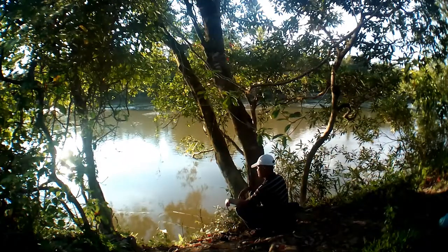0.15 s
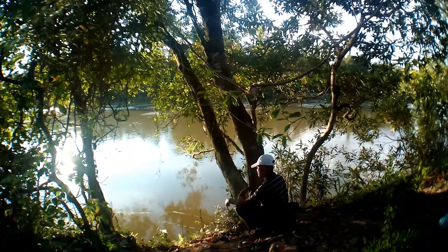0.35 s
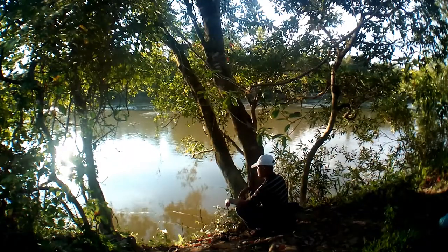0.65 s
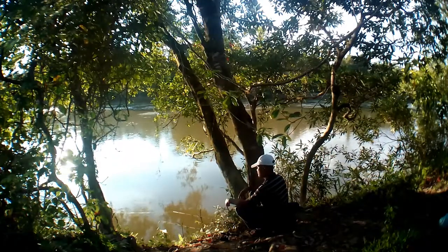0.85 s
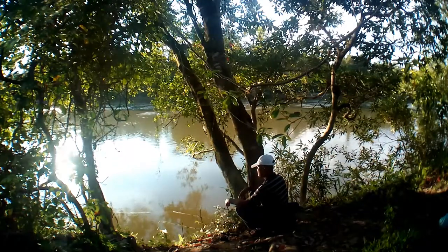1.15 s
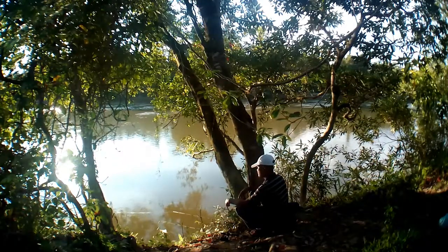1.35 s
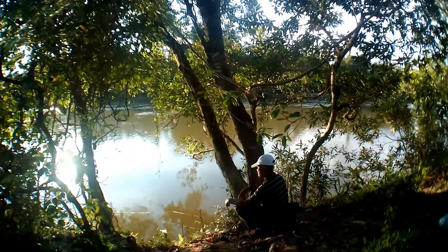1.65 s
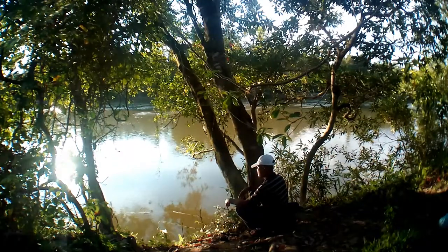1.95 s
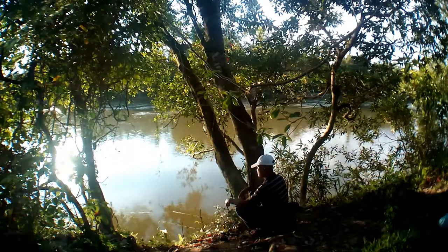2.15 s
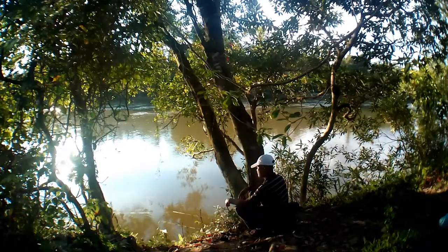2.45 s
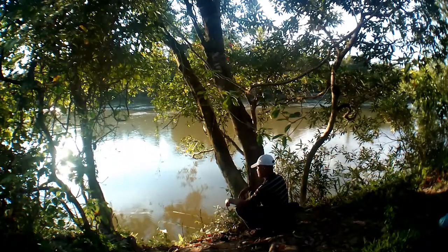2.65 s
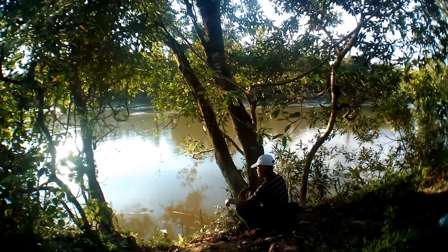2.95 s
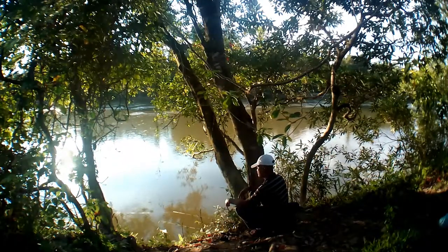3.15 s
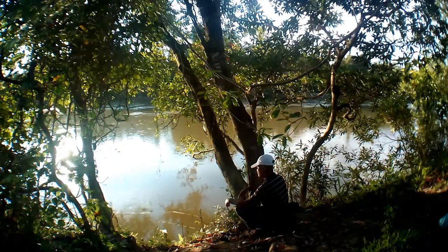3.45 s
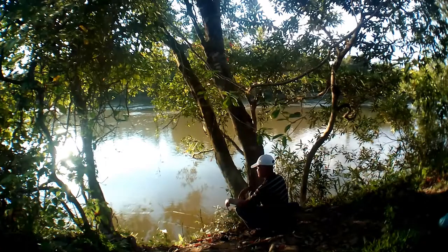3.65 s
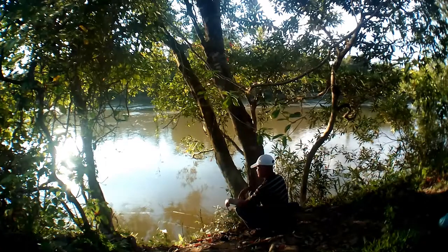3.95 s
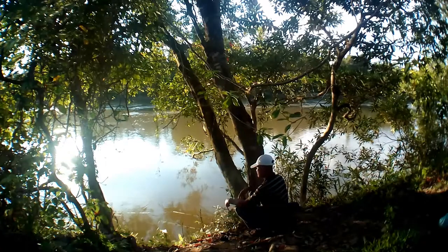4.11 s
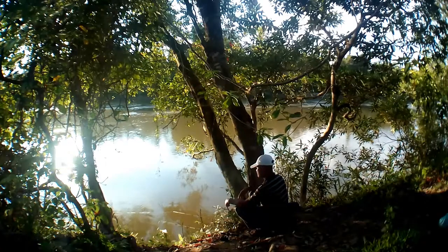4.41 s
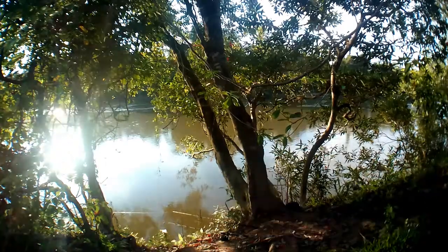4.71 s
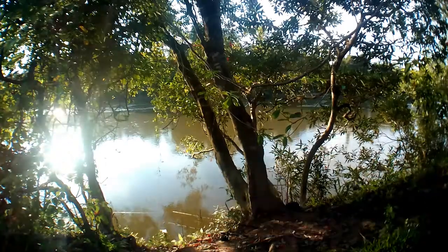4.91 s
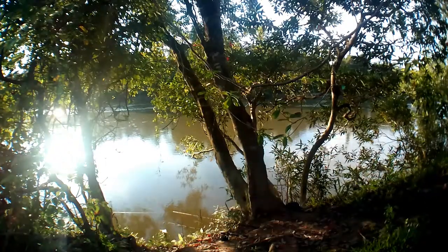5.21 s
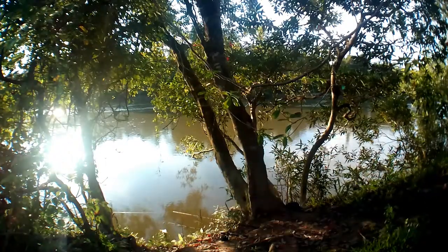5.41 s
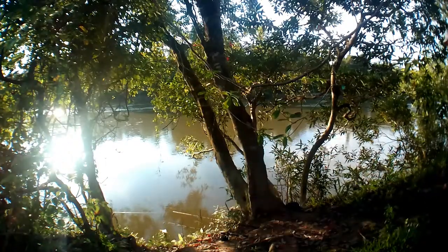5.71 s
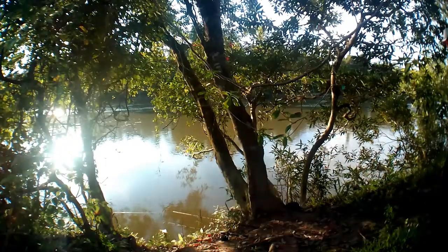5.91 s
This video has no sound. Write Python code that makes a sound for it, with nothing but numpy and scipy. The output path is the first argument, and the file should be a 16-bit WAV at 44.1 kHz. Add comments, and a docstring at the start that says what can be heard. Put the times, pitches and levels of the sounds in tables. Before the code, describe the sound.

Small watery plops, drips and gurgles lap close by at a calm riverbank while a songbird whistles and buzzes, echoing through the trees.

```python
"""Birdsong over a calm, wooded river

Ripples lap at the bank: trapped air bubbles plop and gurgle as gliding, dying sine tones, and tiny droplets
tick as short cracks of noise. A songbird whistles and warbles with a pure tone of swinging pitch, and the
trees ring on after it as tails of dying noise; a smaller bird chips farther off.
Shaped noise makes the bed: far water, leaf hiss and a distant low rumble."""
import sys
import numpy as np
from scipy import signal
from scipy.fft import rfft, irfft, next_fast_len
from scipy.io import wavfile

SR = 44100
rng = np.random.default_rng(int(sys.argv[2]) if len(sys.argv) > 2 else 0)


def bounce(signal):
    """Save signal as a 16-bit WAV file at the path given by the first command-line argument."""
    frames = np.transpose(np.atleast_2d(signal))
    limited = np.clip(frames, -1, 1)
    pcm = np.round(limited * 32767).astype(np.int16)
    wavfile.write(sys.argv[1], SR, pcm)


N = 267687
TIME = np.arange(N) / SR


def from_db(db):
    """Decibels to gain."""
    return 10 ** (np.asarray(db) / 20)


def rms_one(x):
    """Scale to unit power."""
    return x / np.sqrt(np.mean(x ** 2) + 1e-20)


def in_time(rows, t):
    """Read each column of a breakpoint curve at the times t."""
    start_s, *columns = np.transpose(rows)
    return [np.interp(t, start_s, column) for column in columns]


def add(track, start_s, sound):
    """Mix a sound into a track."""
    at = int(np.clip(round(start_s * SR), 0, len(track)))
    track[at:at + len(sound)] += sound[:len(track) - at]


def drift(per_s):
    """Random wander: normal values of spread 1, this many a second, joined by straight lines."""
    knots = rng.standard_normal(4096)
    return np.interp(TIME * per_s, np.arange(len(knots)), knots)


def pair(likeness, size):
    """Two white noises whose correlation is the likeness."""
    mid, side = rng.standard_normal((2, size))
    likeness = np.clip(likeness, -1, 1)
    common = np.sqrt(1 + likeness) * mid
    opposed = np.sqrt(1 - likeness) * side * [[1], [-1]]
    return (common + opposed) / np.sqrt(2)


def coloured(spectrum, likeness):
    """Stereo noise of unit power with a given spectrum, falling away steeply past its ends."""
    hz, db = np.transpose(spectrum)
    size = next_fast_len(N)
    octave = np.log2(np.maximum(np.fft.rfftfreq(size, 1 / SR), 1))
    outside = np.abs(octave - np.clip(octave, np.log2(hz[0]), np.log2(hz[-1])))
    gain = from_db(np.interp(octave, np.log2(hz), db) - 41 * outside)   # 41 dB per octave past the ends
    noise = irfft(rfft(pair(likeness, size)) * gain, size)
    return rms_one(noise[:, :N])


def trees(x, t60_s, build_s, likeness, delay_s=0):
    """Trunks and leaves scatter a sound into a dense tail that builds up and dies away."""
    t = np.maximum(np.arange(2 * SR) / SR - delay_s, 0)
    tail = pair(likeness, len(t)) * from_db(-60 * t / t60_s) * (1 - np.exp(-t / build_s))
    tail /= np.sqrt(np.sum(tail ** 2) / 2)
    return signal.fftconvolve(x[None], tail, axes=1)[:, :len(x)]


def from_left(x, lag_s, pan_db=0):
    """The sound reaches the right microphone later; pan is left level minus right level."""
    left = from_db(pan_db / 2) * x
    right = from_db(-pan_db / 2) * np.interp(TIME - lag_s, TIME, x)
    return np.array([left, right])


# Tone of the distant low noise: pitch_hz [Hz], level_db [relative dB per Hz]
RUMBLE_SPECTRUM = [(18, -56), (30, -3), (59, -11), (182, 0.5), (258, -2), (450, -7), (580, -56),
                   (990, -120)]
# Its swells: start_s [s], level_db [dB before the mix]
RUMBLE_SWELLS = [(0.0, -57.5), (2.48, -58), (2.6, -53), (4.93, -54.5), (4.99, -48), (5.18, -53.5),
                 (6.07, -54)]


def rumble():
    """Distant low noise that swells and wavers, largely shared by the sides once record() inverts the right."""
    level_db, = in_time(RUMBLE_SWELLS, TIME)
    return from_db(level_db - 8.0 + 2.15 * drift(14)) * coloured(RUMBLE_SPECTRUM, likeness=-0.6)


# How busy the bank is: start_s [s], lapping_db [dB before the mix], leaves_db [dB before the mix]
BANK_LEVELS = [(0.0, -51, -79.5), (2.45, -48, -77.5), (2.9, -46, -74), (3.8, -48, -75.5),
               (4.15, -46, -73.5), (5.29, -46.5, -72), (5.72, -44.5, -70), (6.07, -42, -69.5)]


def bank():
    """The rise and fall of the bank over time: lapping level and leaf hiss level."""
    return in_time(BANK_LEVELS, TIME)


# Tone of the far water: pitch_hz [Hz], level_db [relative dB per Hz]
WASH_SPECTRUM = [(180, -57), (300, -11.5), (630, -4.5), (806, 1), (985, -2), (1670, -7.5), (1880, -10),
                 (2410, -12.5), (2910, -17), (3470, -19), (5000, -28), (6500, -78), (11000, -120)]


def wash(lapping_db):
    """Far water: a wide wavering noise that follows the lapping."""
    return from_db(lapping_db - 0.5 + 2.7 * drift(40)) * coloured(WASH_SPECTRUM, likeness=0.014)


# Tone of the leaves: pitch_hz [Hz], level_db [relative dB per Hz]
LEAF_SPECTRUM = [(2060, -28), (3500, -16), (3820, 1), (4710, 0.5), (10100, -6), (11100, -8), (12000, -32),
                 (13000, -59)]


def leaves(leaves_db):
    """Leaf hiss: a bright, wide noise whose level wavers slightly at random."""
    level_waver = from_db(1.6 * drift(30))
    return level_waver * from_db(leaves_db + 9.5) * coloured(LEAF_SPECTRUM, likeness=0.039)


def droplet(hz, life_s):
    """A tiny burst: a crack of noise, strongest around its pitch."""
    t = np.arange(SR // 50) / SR
    noise = rng.standard_normal(len(t)) * np.exp(-t / life_s) * (1 - np.exp(-t / 0.00035))
    crack = signal.sosfilt(signal.butter(2, 3500, "high", fs=SR, output="sos"), noise)
    ring = signal.lfilter(*signal.iirpeak(min(hz, SR / 3), 5, fs=SR), noise)
    return 0.051 * crack + 1.46 * ring


# Single droplets bursting: start_s [s], level_db [dB before the mix], pitch_hz [Hz]
TICKS = [(0.096, -43.5, 11400), (0.265, -43, 4200), (0.6645, -42.5, 6600), (0.7712, -51, 8600),
         (1.5968, -45, 4550), (1.946, -38, 4350), (2.5458, -48, 5230), (2.8766, -53, 4810),
         (2.942, -37, 3270), (3.0404, -47, 4340), (3.1465, -40, 7250), (3.2445, -52, 9200),
         (3.403, -44, 6800), (4.221, -52.5, 10800), (4.593, -46.5, 4940), (4.648, -52, 10200),
         (5.009, -43, 4400), (5.226, -44.5, 7150), (5.3877, -40.5, 6900), (5.606, -38.5, 4240)]


def droplets(level_db, life_s, spray_db, count):
    """Single clear ticks over a faint random spray."""
    out = np.zeros(N)
    for start_s, tick_db, hz in TICKS:
        add(out, start_s, from_db(tick_db + level_db) * droplet(hz, life_s))
    for when, pitch, faintness in rng.random((count, 3)):
        gain = from_db(spray_db - 11.5 * np.sqrt(faintness))
        add(out, when * N / SR, gain * droplet(3000 * 3 ** pitch, life_s))
    return out


BURST_OCTAVES = 0.9   # having climbed this far, a bubble reaches the surface and its ring breaks off
HOOK_S, HOOK_POWER = 0.02, 0.5   # a climb speeds up, with its stated mean rate at this age
SAG_OCTAVES = 0.38   # a falling tone soon levels off, this far down


def bubble(hz, rise, life_s, attack_s):
    """A trapped bubble rings, mostly climbing in pitch as it nears the surface; its envelope peaks at 1."""
    t = np.arange(int(4 * max(life_s, 0.001) * SR)) / SR
    swell = (1 - np.exp(-t / max(attack_s, 1e-4))) * np.exp(-(t / life_s) ** 1.25)
    hook = (t / HOOK_S) ** HOOK_POWER if rise > 0 else 1
    climb = np.clip(rise * t * hook, -SAG_OCTAVES, 2)   # octaves
    pitch = hz * 2 ** climb
    swell = swell * np.exp(-(np.abs(climb) / BURST_OCTAVES) ** 6)
    return swell / swell.max() * np.sin(2 * np.pi * np.cumsum(pitch) / SR)


def gurgle(lapping_db, per_s, centre_hz, octaves, cycles, rise, spread_db):
    """Many small bubbles along the shore; the larger ones ring lower and longer."""
    out = np.zeros(N)
    for when, pitch, faintness, climb, damping in rng.random((int(per_s * N / SR), 5)):
        offset = octaves * np.arcsin(2 * pitch - 1) / (np.pi / 2)   # crowded around the centre pitch
        hz = centre_hz * 2 ** offset
        life_s = cycles * (0.5 + damping) / hz
        db = lapping_db[int(when * N)] - spread_db * np.sqrt(faintness) - 0.51 * offset ** 2
        add(out, when * N / SR, from_db(db) * bubble(hz, rise * climb, life_s, attack_s=0.00059))
    return out


# Ripples breaking on the bank: start_s [s], level_db of their bubbles [dB peak before the mix]
LAPS = [(.49, -43), (2.28, -44), (2.62, -40), (2.71, -43.5), (3.059, -53), (4.66, -42), (4.97, -50),
        (5.459, -38), (5.935, -34.5)]


def laps(count, length_s, spread_db, centre_hz, cycles):
    """Each ripple breaks into a quick cluster of short-lived bubbles, thickest at its start."""
    out = np.zeros(N)
    for start_s, level_db in LAPS:
        for when, pitch, faintness, climb in rng.random((count, 4)):
            hz = centre_hz * 2 ** (2.5 * (pitch - 0.5))
            ring = bubble(hz, 14 * climb, cycles / hz, attack_s=0.001)
            gain = from_db(level_db - spread_db * faintness - 5 * pitch)   # higher ones are softer
            add(out, start_s + length_s * (when ** 1.5 - 0.1), gain * ring)
    return out


def plop(hz, rise, life_s, attack_s):
    """A big bubble's ring; the more abrupt its start, the louder the soft slap that comes with it."""
    ring = bubble(hz, rise, life_s, attack_s)
    t = np.arange(SR // 50) / SR
    soft = signal.butter(2, [500, 3200], "band", fs=SR, output="sos")
    slap = signal.sosfilt(soft, rng.standard_normal(len(t)) * np.exp(-t / 0.0031))
    add(ring, 0, from_db(-12.0) * np.exp(-attack_s / 0.00078) * slap)
    return ring


DRIP_ATTACK_S = 0.00028
# Drops that hit the water with a sharp plink: start_s [s], level_db [dB of the ring before the mix],
# pitch_hz at the start [Hz], glide [octaves per s], life_s [s]
DRIPS = [(0.146, -26.5, 1576, -10, 0.0059), (0.1914, -30, 1570, 12, 0.004), (0.192, -31, 1920, 9, 0.0022),
         (0.249, -33.5, 1945, -8, 0.0054), (0.2904, -35, 1280, -16, 0.007), (0.302, -31.5, 2364, 9, 0.0089),
         (0.3858, -36, 1600, -22, 0.0046), (0.4684, -22, 1960, -12.5, 0.0069),
         (0.4802, -31, 1660, 0, 0.0076), (0.578, -35.5, 2470, -11, 0.0049), (0.9273, -35, 1495, -1, 0.0078),
         (2.582, -35, 967, -19, 0.027), (1.2755, -34.5, 1845, -1, 0.01), (2.6174, -34.5, 1225, -1, 0.0087),
         (2.6211, -38, 2690, -3, 0.0054), (2.634, -38, 3110, 2, 0.0044), (2.644, -41.5, 2400, 0, 0.0044),
         (2.6634, -38, 1330, 3, 0.0073), (2.6843, -31.5, 957, 7, 0.021), (2.684, -30, 1454, -1.5, 0.012),
         (2.7341, -35, 1488, 8, 0.019), (2.745, -28, 1620, 8, 0.0028), (3.087, -22, 1213, -3, 0.006),
         (3.0948, -22.5, 1467, -15, 0.0066), (3.224, -38.5, 1690, 4, 0.0065),
         (3.323, -37.5, 1507, -12.5, 0.022), (3.337, -36, 1600, 6, 0.011),
         (3.6688, -29.5, 2130, -17, 0.0045), (3.814, -36.5, 1710, 2, 0.015),
         (4.0941, -37.5, 1710, -9, 0.0079), (4.1932, -22, 1350, 10.5, 0.0065),
         (4.4856, -26, 920, 4.5, 0.0097), (4.654, -37, 1630, 0, 0.005), (4.7293, -29.5, 2450, -9, 0.0038),
         (4.745, -36, 1330, 10, 0.005), (4.967, -36.5, 2400, -13, 0.007), (5.095, -29, 1610, -9, 0.0067),
         (5.2872, -30.5, 2080, 3, 0.0057), (5.326, -23.5, 1240, 0, 0.0078), (5.355, -31.5, 1104, -1, 0.017),
         (5.515, -16.5, 1150, -5.5, 0.0135), (5.7585, -23.5, 1880, -32, 0.003),
         (5.8666, -33, 1726, -5.5, 0.03), (5.9371, -22, 963, -16.5, 0.012)]
# Trapped bubbles, mostly climbing in pitch: start_s [s], level_db [dB of the ring before the mix],
# pitch_hz at the start [Hz], rise [octaves per s], life_s [s], attack_s [s]
PLOPS = [(0.0342, -34, 737, 19.5, 0.011, 0.006), (0.1903, -31, 720, 12.5, 0.035, 0.0012),
         (0.17, -41, 1770, 16, 0.012, 0.004), (0.2245, -35.5, 1470, 30, 0.01, 0.0025),
         (0.3263, -41.5, 1130, 8, 0.013, 0.0081), (0.478, -31, 973, 12.5, 0.013, 0.0054),
         (0.752, -41, 595, 3, 0.025, 0.0088), (0.8265, -30, 900, 25.5, 0.015, 0.0033),
         (0.995, -37.5, 733, 3, 0.03, 0.0042), (1.5782, -32.5, 1027, 1.5, 0.015, 0.0035),
         (1.9809, -22.5, 1070, 15.5, 0.0098, 0.00043), (1.997, -33, 1284, 19, 0.0096, 0.0046),
         (2.5243, -31.5, 1136, 6.5, 0.016, 0.00043), (2.6221, -33.5, 657, 5, 0.015, 0.006),
         (2.7005, -33, 761, 19, 0.037, 0.00019), (2.8686, -37.5, 827, 5.5, 0.017, 0.0029),
         (3.0399, -35.5, 833, 15.5, 0.019, 0.00066), (3.087, -24, 658, 16, 0.068, 0.0015),
         (3.3842, -31.5, 950, 7, 0.0057, 0.002), (3.4227, -19.5, 1200, 40, 0.0048, 0.0088),
         (4.03, -37, 741, 5.5, 0.033, 0.005), (4.177, -21, 1048, 25, 0.0086, 0.00022),
         (4.484, -28, 1371, 16, 0.013, 0.00042), (1.1015, -30.5, 1450, 8, 0.0033, 0.004),
         (4.9642, -31, 798, 4.5, 0.014, 0.006), (5.155, -38, 690, 6.5, 0.019, 0.0044),
         (5.2101, -28, 758, 7.5, 0.018, 0.0036), (5.3222, -16, 1403, 30, 0.0056, 0.0042),
         (5.5416, -33.5, 1100, 1, 0.0243, 0.0045), (5.556, -33, 561, 1, 0.024, 0.0076),
         (5.824, -35, 1560, 42, 0.011, 0.00022), (5.866, -31, 1045, -1.5, 0.012, 0.0023),
         (5.9492, -30.5, 937, 8, 0.013, 0.0021)]


def plops():
    """Drips start at once; a trapped bubble may swell first. Each rings out while its pitch glides."""
    out = np.zeros(N)
    for start_s, level_db, hz, glide, life_s in DRIPS:
        add(out, start_s, from_db(level_db) * plop(hz, glide, life_s, DRIP_ATTACK_S))
    for start_s, level_db, hz, rise, life_s, attack_s in PLOPS:
        add(out, start_s, from_db(level_db) * plop(hz, rise, life_s, attack_s))
    return out


WATER_LAG_S = 0.00027   # the water lies to the left


def near_water(lapping_db):
    """Plops, two sizes of gurgle and breaking ripples, with a faint scattered tail."""
    small = from_db(10.0) * gurgle(lapping_db, per_s=220, centre_hz=896.0, octaves=1.105,
                                   cycles=10.6, rise=11.4, spread_db=16.0)
    trickle = from_db(5.5) * gurgle(lapping_db, per_s=230, centre_hz=1655, octaves=1.223,
                                    cycles=6.9, rise=6.6, spread_db=17)
    breaking = from_db(5.0) * laps(count=13, length_s=0.078, spread_db=14.5, centre_hz=1606, cycles=13.3)
    water = plops() + small + trickle + breaking
    tail = from_db(-17.0) * trees(water, t60_s=0.85, build_s=0.0033, likeness=0.18)
    return from_left(water, WATER_LAG_S, pan_db=-2.0) + tail


# One sharp, high tsip: start_s [s], level_db [dB peak], pitch_hz at the start [Hz],
# rise [octaves per s, negative for a fall], life_s [s], attack_s [s]
TSIP = (4.0232, -35.5, 9500, -110, .0026, .001)


def tsip():
    """A very short, falling tsip, perhaps from a bird or insect: one gliding, dying sine tone."""
    start_s, level_db, *tone = TSIP
    out = np.zeros(N)
    add(out, start_s, from_db(level_db) * bubble(*tone))   # the same gliding tone as a bubble's
    return out


BIRD_LAG_S = 0.000008   # the birds are almost straight ahead
# The wood answers the birds twice: at once, then from across the river
NEAR_TRUNKS_DB, NEAR_TRUNKS_T60_S, FAR_BANK_DELAY_S = -0.5, 0.61, 0.1
LEAF_DAMPING_HZ, HIGH_T60_SHARE = 3530, 0.6   # above this pitch the far bank's ring dies sooner


def wood_echo(voice, t60_s, likeness):
    """A quick first echo from close trunks, then a longer ring from the far bank, duller as it fades."""
    echo = from_db(NEAR_TRUNKS_DB) * trees(voice, NEAR_TRUNKS_T60_S, 0.0025, likeness=0.83)
    for kind, ring_s in (("low", t60_s), ("high", t60_s * HIGH_T60_SHARE)):
        split = signal.butter(4, LEAF_DAMPING_HZ, kind, fs=SR, output="sos")
        echo = echo + trees(signal.sosfilt(split, voice), ring_s, 0.012, likeness, FAR_BANK_DELAY_S)
    return echo


def bird(phrases, direct_db, echo_db, t60_s, waver, likeness):
    """A pure whistle, warbled by a fast swing in pitch, and its ring in the wood."""
    voice = np.zeros(N + SR)   # one second of lead-in, so that earlier notes still ring at the start
    for warble_per_s, rows in phrases:
        t = np.arange(rows[0][0], rows[-1][0], 1 / SR)
        hz, db, depth_hz = in_time(rows, t)
        swing = depth_hz * np.sin(2 * np.pi * warble_per_s * t + 0.53 * drift(37.0)[:len(t)])
        pitch = hz * (1 + waver * drift(178.4)[:len(t)]) + swing
        db = db + 40 * swing / hz + 1.3 * drift(105.0)[:len(t)]   # louder at the top of each swing
        fade = signal.windows.tukey(len(t), 0.06)
        tone = np.sqrt(2) * np.sin(2 * np.pi * np.cumsum(pitch) / SR)
        add(voice, t[0] + 1, fade * from_db(db) * tone)
    direct = from_left(voice[SR:], BIRD_LAG_S)
    echo = wood_echo(voice, t60_s, likeness)[:, SR:]
    return from_db(direct_db) * direct + from_db(echo_db) * echo


def chip(start_s, hz, db, length_s, glide):
    """A thin note that swells and fades as its pitch glides, as a phrase for the bird."""
    rows = [(start_s + length_s * part, hz * 2 ** (glide * part), db - 20 * abs(part - 0.5), 90)
            for part in (0, 0.5, 1)]
    return 90, rows   # 90 swings per s, 90 Hz deep


# The small far bird: start_s [s], pitch_hz at the start [Hz], level_db [dB before the mix],
# length_s [s], glide [octaves over the note]
CHIPS = [(1.487, 5220, -58.5, 0.02, -0.36), (1.612, 6670, -67, 0.024, -0.28),
         (1.663, 5300, -67.5, 0.055, .002), (3.879, 4630, -78, 0.312, .02)]


def far_bird():
    """A smaller bird's thin chips, with a long ring in the wood."""
    return bird([chip(*row) for row in CHIPS], direct_db=17, echo_db=17.5, t60_s=4.4,
                waver=0.0023, likeness=0.58)


def arc(start_s, length_s, pitches, db):
    """A note bends smoothly through three pitches: times, pitch, level."""
    part = np.linspace(-1, 1, 21)
    hz = np.polyval(np.polyfit([-1, 0, 1], pitches, 2), part)
    return start_s + length_s * (part + 1) / 2, hz, np.full_like(hz, db)


# Pure slurs: start_s [s], length_s [s], first_hz [Hz], middle_hz [Hz], last_hz [Hz],
# level_db [dB before the mix]
WHISTLES = [(-.12, 0.04, 3090, 2870, 2870, -40), (0.01, 0.086, 2900, 2002, 2260, -45),
            (0.129, 0.14, 2220, 2601, 2376, -43), (0.228, 0.084, 2333, 1855, 2092, -44.5),
            (0.782, 0.032, 2726, 2267, 1830, -42.5), (0.898, 0.061, 2430, 2296, 2230, -45),
            (1.055, 0.1, 3680, 3446, 3280, -38), (1.115, 0.089, 3340, 2905, 2247, -39),
            (1.5, 0.07, 2880, 2772, 2784, -39.5), (1.668, 0.055, 2706, 2340, 2210, -43.5),
            (5.836, 0.024, 2660, 2560, 2380, -34), (6.002, 0.041, 2330, 2290, 2130, -39)]
# Rasping notes: start_s [s], length_s [s], first_hz [Hz], middle_hz [Hz], last_hz [Hz],
# level_db [dB before the mix]
BUZZES = [(-.31, 0.085, 3380, 3314, 3160, -43), (0.568, 0.015, 3310, 3623, 3690, -38.5),
          (.583, 0.098, 3707, 3752, 3732, -41), (0.622, .027, 3690, 3345, 2970, -39),
          (0.664, 0.093, 2935, 2760, 2717, -43), (1.193, .17, 2843, 3116, 3415, -45),
          (1.719, 0.14, 2200, 2890, 3803, -41.5), (1.798, 0.11, 2700, 2760, 2770, -43)]
# The rasp sets in above this pitch and swings by a share of the excess
BUZZ_PER_S, BUZZ_FROM_HZ, BUZZ_DEPTH = 136, 2270, 0.17
# Slower trills: start_s [s], length_s [s], pitch_hz at the middle [Hz], level_db [dB before the mix],
# rate [swings per s]
TRILLS = [(0.345, 0.305, 2600, -50, 31), (5.86, 0.14, 2527, -43, 33)]
TRILL_DEPTH, TRILL_ARCH = 0.065, 0.0296   # shares of the pitch


def song_notes():
    """Whistles, buzzes and trills, each as (warbles per s, rows of (s, pitch Hz, level dB, warble depth Hz))."""
    notes = []
    for start_s, length_s, *pitches, db in WHISTLES:
        t, hz, level = arc(start_s, length_s, pitches, db)
        notes.append((0, np.transpose([t, hz, level, np.zeros_like(hz)])))
    for start_s, length_s, *pitches, db in BUZZES:
        t, hz, level = arc(start_s, length_s, pitches, db)
        depth_hz = BUZZ_DEPTH * np.maximum(hz - BUZZ_FROM_HZ, 0)
        notes.append((BUZZ_PER_S, np.transpose([t, hz, level, depth_hz])))
    for start_s, length_s, top_hz, db, per_s in TRILLS:
        ends_hz = top_hz * (1 - TRILL_ARCH)
        t, hz, level = arc(start_s, length_s, [ends_hz, top_hz, ends_hz], db)
        notes.append((per_s, np.transpose([t, hz, level, TRILL_DEPTH * hz])))
    return notes


def songbird():
    """The songbird's whistles, buzzes and trills, ringing on among the trees."""
    return bird(song_notes(), direct_db=-3.0, echo_db=-0.5, t60_s=3.18, waver=0.0029, likeness=0.13)


def scene():
    """Water close by on the left, birds ahead, a soft bed of river and leaves."""
    lapping_db, leaves_db = bank()
    bed = rumble() + wash(lapping_db) + leaves(leaves_db)
    spray = droplets(level_db=11.5, life_s=0.00075, spray_db=-37.0, count=220)
    spray_tail = from_db(5.0) * trees(spray, t60_s=0.089, build_s=0.0032, likeness=0.0)
    ticks = from_left(spray, lag_s=0.00007, pan_db=9.0) + spray_tail
    high_tsip = from_left(tsip(), lag_s=0.00006)
    return bed + ticks + near_water(lapping_db) + high_tsip + far_bird() + songbird()


CUTOFF_HZ = 13000


def record(dry):
    """The two microphones are opposite in polarity; the top is cut."""
    top_cut = signal.ellip(10, 0.2, 80, CUTOFF_HZ, fs=SR, output="sos")
    return signal.sosfilt(top_cut, dry * [[1], [-1]])


dry = scene()
out = record(dry)
bounce(out)
```